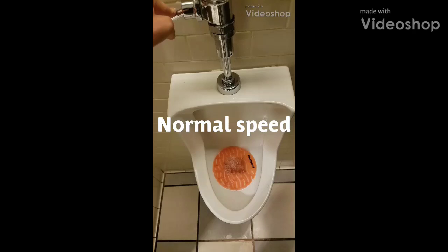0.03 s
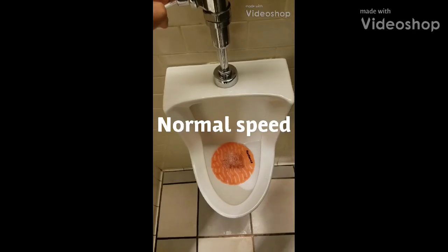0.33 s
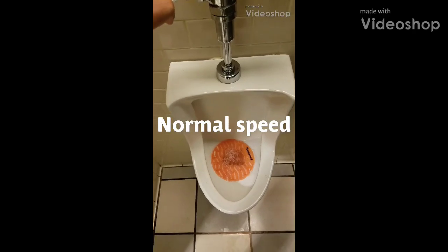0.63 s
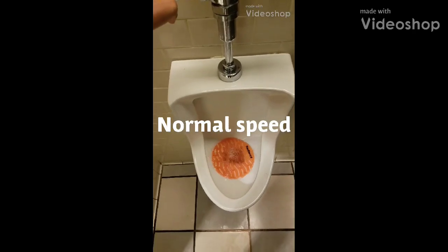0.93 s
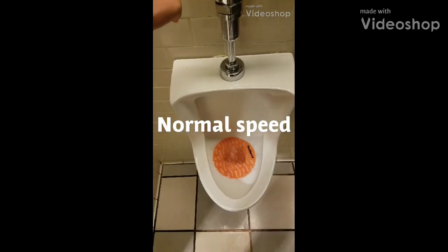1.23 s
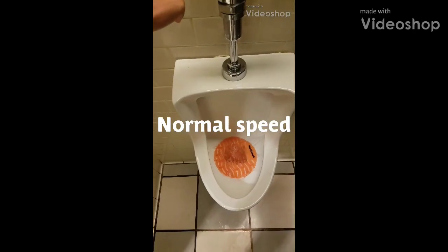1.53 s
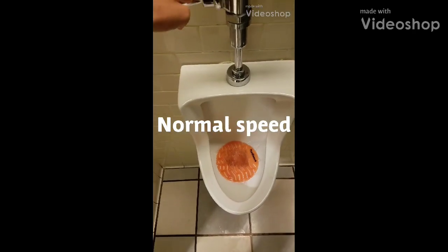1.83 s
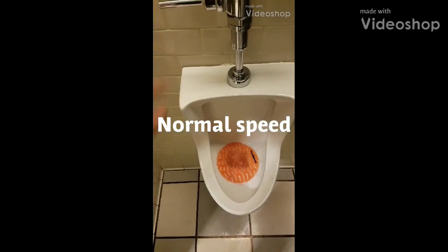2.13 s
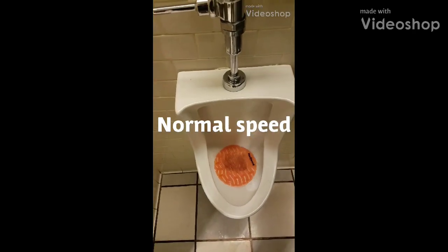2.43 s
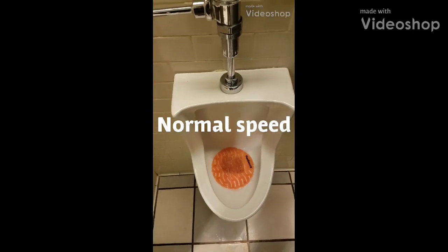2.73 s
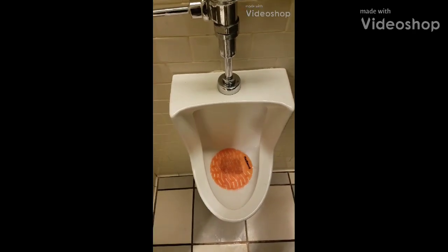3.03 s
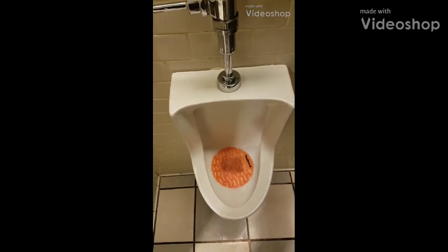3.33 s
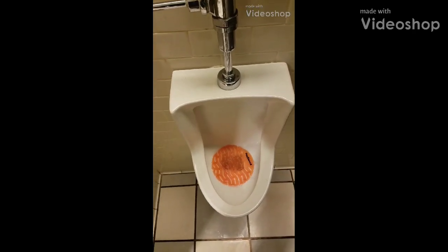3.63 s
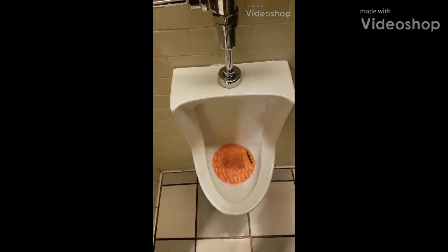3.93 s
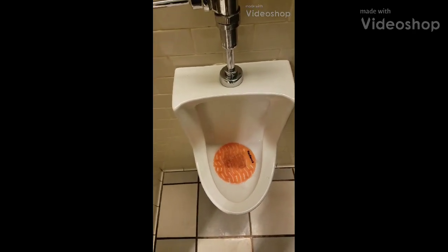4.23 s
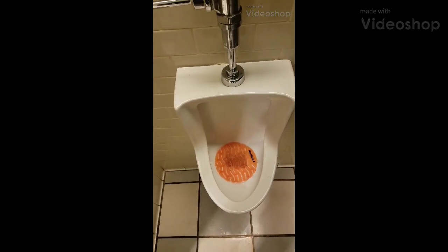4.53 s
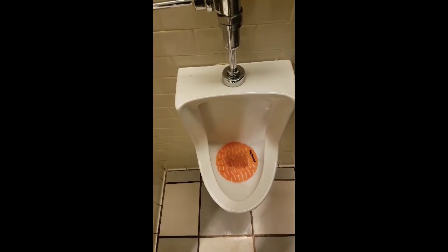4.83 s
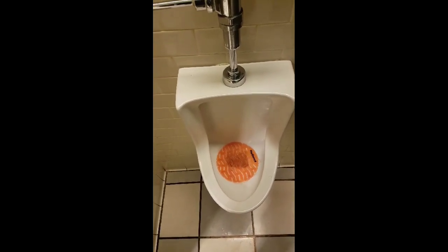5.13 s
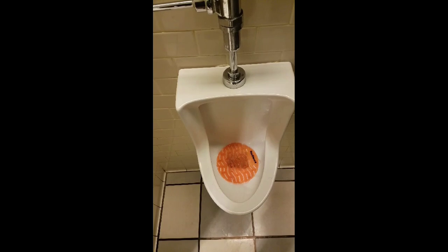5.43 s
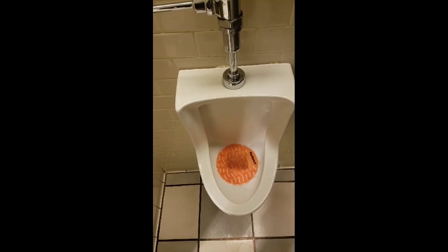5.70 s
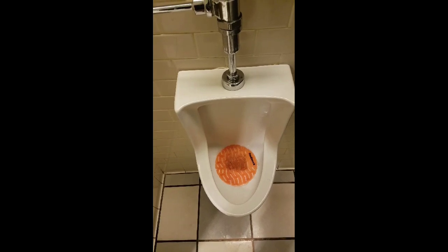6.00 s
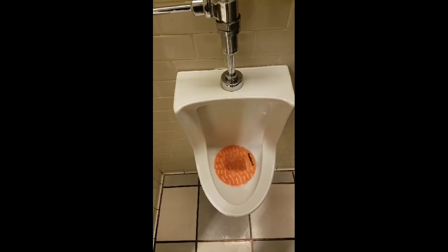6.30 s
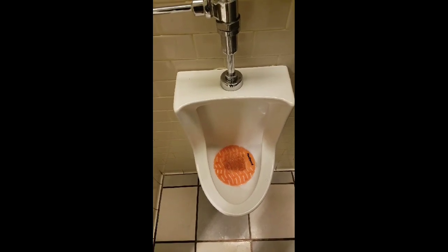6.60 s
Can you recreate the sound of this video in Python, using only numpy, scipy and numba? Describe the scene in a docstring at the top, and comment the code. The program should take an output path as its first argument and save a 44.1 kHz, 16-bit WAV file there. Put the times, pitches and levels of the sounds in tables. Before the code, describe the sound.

A urinal flushes with hissing, splashing water, then the pipe gives a loud horn-like groan and water drips in an echoing restroom.

```python
"""A thump and a rush of hissing water: a urinal is flushed in a tiled restroom, over a low rumble.
The jet sprays the porcelain, splashes in the pool and drags gulps of air into the trap (the drain's bend).
As the valve closes, its rubber diaphragm flutters and sounds the pipe like a horn: a loud groan that
hisses with collapsing vapour bubbles and rings on in the room. Then the last water trickles and drips."""
import sys
import numpy as np
from scipy import signal
from scipy.fft import rfft, irfft, next_fast_len
from scipy.io import wavfile
from numba import njit

SR = 44100
rng = np.random.default_rng(int(sys.argv[2]) if len(sys.argv) > 2 else 0)


def transcribe(u):
    """Save the signal u as a 16-bit wav file named by the first command-line argument.

    u: samples, shape (n,) or (channels, n), limited to [-1, 1]; the rate is SR.
    q: integer samples, one column per channel.
    """
    v = np.clip(np.atleast_2d(u).T, -1, 1)
    q = np.round(v * 32767).astype(np.int16)
    wavfile.write(sys.argv[1], SR, q)


N = 298116
T = np.arange(N) / SR
START_S, TRAP_CLEARS_S = 0.1332, 1.895  # the sound begins; the trap stops drawing air
SPUTTER_START_S, SPUTTER_END_S = 2.988, 3.098
GROAN_START_S = 4.072

# how hard water pours into the pool (time [s], level [dB])
POUR_LEVEL = [(0.14, -4.5), (0.26, -6.5), (0.41, -0.5), (1.12, 2), (1.62, -2), (2.05, -11), (2.36, -7.5),
              (2.55, -14), (3.45, -20), (4.04, -15)]
# tone of sizzling water (frequency [Hz], level [dB])
SIZZLE_TONE = [(3000, -39), (3700, -2), (4300, -3.5), (4800, 1), (5300, -3.5), (6100, -2.5), (7200, -24.5)]
# tone of spray hitting porcelain (frequency [Hz], level [dB])
SLAP_TONE = [(700, -21), (1800, -11), (2400, -6.5), (2670, 1), (3000, -5.5), (3500, -15.5), (4200, -10),
             (5000, -22), (15000, -37)]
# tone of the rumble of room and pipes (frequency [Hz], level [dB])
RUMBLE_TONE = [(20, -39), (45, -6.5), (65, -5.5), (85, 7.5), (105, -2.5), (160, -0.5), (220, -3.5),
               (340, -1), (500, -14), (900, -22.5), (2500, -19), (6000, -39), (15000, -53)]


def undb(db):
    """Turn decibels into a gain."""
    return 10 ** (np.asarray(db) / 20)


def unit(x):
    """Scale a signal to an average strength (rms) of 1."""
    return x / np.sqrt(np.mean(x ** 2) + 1e-20)


def curve(points):
    """Join (time, value) points with straight lines."""
    return np.interp(T, *np.transpose(points))


def at(points, hz):
    """Read between (frequency, value) points, with octaves evenly spaced."""
    f, value = np.transpose(points)
    return np.interp(np.log(hz + 1), np.log(f), value)


def colour(x, tone):
    """Filter a signal by (frequency, level) points; the result has strength 1."""
    size = next_fast_len(len(x))
    gain = undb(at(tone, np.fft.rfftfreq(size, 1 / SR)))
    return unit(irfft(rfft(x, size) * gain, size)[:len(x)])


def noise():
    """White noise."""
    return rng.standard_normal(N)


def wander(rate):
    """A random curve of strength 1 that turns about `rate` times a second."""
    return unit(np.interp(T * rate, np.arange(N // 20), rng.standard_normal(N // 20)))


def since(start):
    """Seconds since a moment; 0 before it."""
    return np.maximum(T - start, 0)


def between(start, end, fade):
    """1 from start to end, fading to 0 on either side."""
    return np.clip(1 + np.minimum(T - start, end - T) / fade, 0, 1)


def bursts(times, peaks_db, rise, decay):
    """A loudness curve that jumps up and dies away at each given time."""
    out, t = np.zeros(N + SR), T[:SR // 5]
    shape = (1 - np.exp(-t / rise)) * np.exp(-t / decay)
    for s, db in zip(times, peaks_db):
        out[int(s * SR):int(s * SR) + len(t)] += undb(db) * shape / shape.max()
    return out[:N]


@njit
def ring(start, hz, ring_s, size, glide):
    """Each bubble rings as a fading tone whose pitch rises as it nears the surface."""
    out = np.zeros(N)
    for k in range(len(start)):
        first, length, phase = int(start[k] * SR), int(ring_s[k] * SR) + 2, 0.
        for i in range(min(length, N - first)):
            phase += 2 * np.pi * hz[k] * (1 + glide * i / length) / SR
            envelope = np.exp(-6.9 * i / length) * (1 - np.exp(-phase / 5))
            out[first + i] += size[k] * envelope * np.sin(phase)
    return out


def bubbles(lo_hz, hi_hz, cycles, spread_db, count):
    """A cloud of bubbles of all sizes; more spread makes a few stand out."""
    when, pitch, chance = rng.random((count, 3)).T
    hz = lo_hz * (hi_hz / lo_hz) ** pitch
    size = undb(-spread_db * np.log(.02 + chance)) * hz / lo_hz
    return unit(ring(when * N / SR, hz, cycles / hz, size, glide=0.19))


def patter(spread_db, rate):
    """Droplets bursting: noise whose strength jumps from one instant to the next."""
    return noise() * undb(spread_db * wander(rate))


def pipe_thump():
    """The pipe knocks and thumps as the valve opens."""
    thump = colour(noise(), [(25, -16), (45, -14), (80, -6), (200, 1), (500, -3), (2000, -50)])
    knock = colour(noise(), [(60, 5), (600, 2), (4000, -12), (9000, -28)])
    return (thump * bursts([.146], [-38], rise=0.0052, decay=0.055)
            + knock * bursts([.156], [-29], rise=.0002, decay=0.0012))


def jet():
    """The jet hisses, flickering while air is drawn in, and sizzles more as the valve narrows."""
    # flow through the valve (time [s], level [dB])
    flow_level = [(0.14, -3), (0.3, -0.5), (0.83, 1.5), (1.22, 0.9), (1.45, 1), (2.4, -2), (3.2, -3.2),
                  (3.6, -5), (4.04, -10.5)]
    # tone of the jet (frequency [Hz], level [dB])
    jet_tone = [(120, -39), (230, -51), (310, -74), (410, 2), (520, 0), (740, -24.5), (1300, -16),
                (1800, -11.5), (2400, -12.5), (2800, -10), (3300, -15.5), (4500, -19.5), (7000, -16.5),
                (8800, -15), (9800, -15.5), (13500, -13), (15700, -14)]
    flow_db = curve(flow_level)
    flicker_db = 1.1 * wander(30) * between(0, TRAP_CLEARS_S, fade=.3)
    narrowing_db = 11.5 * np.minimum(since(1.17) / 0.57, 1)
    hiss = in_bowl(colour(patter(spread_db=1.5, rate=400), jet_tone))
    sizzle = in_bowl(colour(patter(spread_db=0.5, rate=100), SIZZLE_TONE))
    return hiss * undb(-42.5 + flow_db + flicker_db) + sizzle * undb(-59 + flow_db + narrowing_db)


def in_bowl(x):
    """Quick echoes off the porcelain make a sound hollow."""
    # echoes from the bowl's walls (delay [s], gain [ratio])
    echoes = [(.0009, 0.17), (.0021, -0.13), (.0034, .12)]
    return unit(x + sum(gain * np.interp(T - delay, T, x, left=0) for delay, gain in echoes))


def trap_churn():
    """Air churns in the trap, dies down as the trap clears and is stirred again by the sputter."""
    # tone of the churning (frequency [Hz], level [dB])
    churn_tone = [(40, -56), (90, -28.5), (190, -20.5), (260, -12), (320, -9), (352, 7.5), (378, -23.5),
                  (406, -2.5), (450, -21.5), (490, -12), (650, -34), (1200, -53)]
    clearing_db = -11 * np.minimum(since(TRAP_CLEARS_S) / 0.12, 1)
    stirring_db = 11 * between(SPUTTER_START_S, SPUTTER_END_S, fade=0.071)
    churn = colour(bubbles(54.3, 940, cycles=7.3, spread_db=2.0, count=5000), churn_tone)
    return churn * undb(-36.5 + 0.94 * curve(POUR_LEVEL) + clearing_db + stirring_db)


def splash_and_spray():
    """Water splashes unevenly in the pool and sprays the porcelain, making clouds of bubbles."""
    # tone of the pool (frequency [Hz], level [dB])
    splash_tone = [(350, -38), (560, -14), (635, 6), (665, 8), (700, 2.5), (800, 1), (1100, -3), (1480, -6),
                   (1560, -2), (1650, -4.5), (2100, -10), (3500, -19), (7000, -48)]
    # tone of the spray (frequency [Hz], level [dB])
    spray_tone = [(900, -16), (1800, -12.5), (2200, 1.5), (2450, -1), (2680, -1), (3000, -3.5), (3400, -12),
                  (4000, -8), (6000, -34), (15000, -43)]
    weakens_s, mist_db = 2.294, -57  # spray builds until the jet falls short; a fine mist stays
    spray_db = np.maximum(-42 - 6.5 * np.maximum(weakens_s - T, 0) - 53 * since(weakens_s), mist_db)
    splash_db = -41 + curve(POUR_LEVEL)
    splash = colour(bubbles(450, 6000, cycles=16, spread_db=2, count=11000), splash_tone)
    splash *= undb(splash_db + 0.7 * wander(16))
    spray = colour(bubbles(1252, 14400, cycles=22, spread_db=2.5, count=20000), spray_tone)
    spray *= undb(spray_db + 0.7 * wander(16))
    # a few millimetre-sized bubbles ring out of the spray
    pings = colour(bubbles(2020, 4850, cycles=70, spread_db=3, count=1600), SLAP_TONE)
    return splash + spray + pings * undb(np.maximum(spray_db, splash_db - 9.5) - 3)


def rumble():
    """The ventilation rumbles and wavers; the supply pipe joins in, shuddering as the valve opens."""
    vent = undb(-59.5)
    shudder = undb(-42) * np.exp(-since(START_S) / 0.28)
    pipe = undb(-62 + curve(POUR_LEVEL)) + shudder
    return colour(noise(), RUMBLE_TONE) * np.hypot(vent, pipe) * undb(wander(4))


def tiled_room():
    """Return a function giving the echo off the tiles, where each octave fades at its own rate."""
    # how long the room rings (frequency [Hz], time to fade by 60 dB [s])
    ring_times = [(100, 1.2), (400, 1.65), (800, 1.5), (1600, 1.2), (3200, 1.2), (6400, 1), (12800, .55)]
    t = T[:2 * SR]
    spectrum, f = rfft(rng.standard_normal(len(t))), np.fft.rfftfreq(len(t), 1 / SR)
    octaves_hz, tail = 100 * 2. ** np.arange(8), 0
    for hz, share in zip(octaves_hz, np.eye(len(octaves_hz))):
        band = irfft(spectrum * np.interp(np.log(f + 1), np.log(octaves_hz), share))
        fade_rate = np.log(1000) / at(ring_times, hz)
        tail += band * np.exp(-fade_rate * t) * np.sqrt(2 * fade_rate / SR)
    size = next_fast_len(N + len(t))
    response = rfft(tail * np.clip(t / 0.0009, 0, 1), size)
    return lambda x: irfft(rfft(x, size) * response, size)[:N]


def gulps():
    """Single pockets of air ring in the pipe, trap and drain."""
    # air pockets (time [s], level [dB], pitch [Hz])
    pockets = [(0.141, -31.5, 339), (0.328, -25.5, 343), (0.409, -25, 342), (0.533, -37, 356),
               (0.667, -22, 357), (0.859, -24.5, 339), (1.08, -23, 351.3), (1.31, -24, 351),
               (1.414, -27, 341), (1.592, -24, 350), (1.759, -33, 351), (1.87, -35, 353.7),
               (2.333, -30, 402), (2.744, -47, 134), (3.059, -37.5, 345), (3.535, -41, 1585),
               (3.53, -42, 346), (3.6, -42, 351.4), (3.859, -40, 1145), (3.905, -40.5, 827),
               (3.976, -39.5, 514), (5.243, -38, 329), (5.33, -38, 289), (6.071, -39, 305)]
    times, db, hz = np.array(pockets, float).T.copy()
    return ring(times, hz, ring_s=67 / hz, size=undb(db), glide=0.03)


def spray_slaps():
    """Spray slaps the bowl, each hit with a bright edge of hiss."""
    # slaps (time [s], level [dB])
    hits = [(0.842, -32.5), (0.906, -37.5), (0.9366, -36), (1.0812, -35), (1.208, -33.5), (1.232, -35),
            (1.3356, -31.5), (1.4735, -37), (1.549, -37.5), (1.6633, -33.5), (1.919, -35.5), (1.987, -34.5),
            (2.064, -33), (2.237, -33.5)]
    slap = colour(noise(), SLAP_TONE) + undb(-21) * colour(noise(), SIZZLE_TONE)
    return slap * bursts(*np.transpose(hits), rise=0.0017, decay=0.0081)


def valve_whistle():
    """The narrowing gap of the valve sings faintly."""
    whistle = colour(noise(), [(4600, -41), (5050, -15), (5230, 17), (5600, -8), (6300, -30)])
    return whistle * undb(-51) * between(2.16, 2.34, fade=0.41)


def valve_sputter():
    """A pocket of air passes through the valve: a sputter that starts hard and sags."""
    # tone of the sputter (frequency [Hz], level [dB])
    sputter_tone = [(600, -19), (1500, -8), (1790, -5), (1950, -8), (2130, 4), (2350, -12), (2660, 4.5),
                    (2950, -16), (3260, -3), (3600, -15), (4700, -7.5), (8000, -38)]
    spit = colour(patter(spread_db=1.5, rate=150), sputter_tone) * undb(-38.5)
    hiss = colour(noise(), SIZZLE_TONE) * undb(-52)
    sag = undb(-26 * since(SPUTTER_START_S))
    return (spit + hiss) * sag * between(SPUTTER_START_S, SPUTTER_END_S, fade=0.017)


def groan(room):
    """The valve's diaphragm beats against its seat and sounds the pipe like a horn."""
    # pitch of the flutter (time [s], pitch [Hz])
    pitch = [(4.055, 383), (4.08, 402), (4.105, 409), (4.135, 391), (4.18, 390), (4.25, 392.5), (4.46, 395),
             (4.66, 395.3), (4.78, 393.7)]
    # the horn's tones (multiple of the pitch [ratio], relative level [dB], echo against direct [dB])
    harmonics = [(1, -3, -3), (2, 0.24, -14.5), (3, -7, -17), (4, -10, -9), (5, -16.5, 2), (6, -14.5, 28),
                 (7, -14, 33), (8, -19, -2), (9, -14.5, -3), (10, -17.5, 27), (11, -19, 20), (12, -19.5, 2),
                 (13, -26, 5), (14, -23.5, -6), (15, -41, 10), (16, -24.5, -6)]
    end_s, pipe_ring_s = 4.762, 0.035  # the pipe rings on, higher tones more briefly
    age = since(GROAN_START_S)
    swell_db = -11 * np.exp(-age / 0.067)
    # timing and loudness lurch until the flutter locks to the pipe
    uneven = 0.0072 + .2 * np.exp(-age / .13)
    # no two beats are equally long, which blurs the high tones
    hz = curve(pitch) * (1 + .0075 * wander(400))
    phase = 2 * np.pi * np.cumsum(hz) / SR + uneven * wander(250)
    attack = between(GROAN_START_S, 7, fade=0.018)
    horn = 0
    for k, db, echo_db in harmonics:
        sounding = attack * np.exp(-k * since(end_s) / pipe_ring_s)
        # the three tones that the pipe favours grow; the others waver and fade
        drift_db = 7 * age if k in (1, 2, 7) else 2.6 * wander(16) - 5.5 * age
        size = undb(swell_db + drift_db + 22 * uneven * wander(40)) * sounding
        tone = np.sin(k * phase + rng.uniform(0, 2 * np.pi)) * size
        heard = unit(tone) + undb(echo_db) * unit(room(tone))
        horn += undb(db - 26) * heard / np.std(heard[sounding > .5])
    hiss = vapour_hiss(phase)
    return horn + undb(-5.5) * hiss + undb(-4) * room(hiss)


def vapour_hiss(phase):
    """Vapour bubbles form and collapse behind the valve seat each time it opens (cavitation)."""
    # tone of the collapsing bubbles (frequency [Hz], level [dB])
    hiss_tone = [(100, -19), (280, -10.5), (450, 10.5), (620, -9), (1000, -10.5), (1400, -3.5), (2000, 1.5),
                 (2600, 3), (3200, -3), (4700, 2), (6800, -3.5), (8200, -7), (10000, -11.5), (13000, -7),
                 (15700, -9.5)]
    end_s, fade_s = 4.748, 0.024  # the flow stops just before the flutter does
    building = 1 - np.exp(-since(GROAN_START_S - fade_s) / 0.028)
    level = undb(-28 - 8 * since(GROAN_START_S)) * building * between(0, end_s, fade_s)
    return colour(noise() * (1 + np.cos(phase)), hiss_tone) * level


def droplets():
    """Tiny droplets fizz and tick on the bare porcelain."""
    # ticks (time [s], level [dB])
    hits = [(5.095, -48.5), (5.122, -51), (5.198, -59), (5.243, -55), (5.69, -61), (5.825, -52.5),
            (6.41, -55.5)]
    fizz = colour(patter(spread_db=5, rate=90), [(3000, -6), (7000, -2), (10000, -4), (14000, 0)])
    ticks = colour(noise(), [(2500, -7), (6500, 1.5), (10000, -21), (13500, -5)])
    return (fizz * undb(-78) * between(4.7, 7, fade=0.16)
            + ticks * bursts(*np.transpose(hits), rise=0.00078, decay=0.0056))


def trickle():
    """A film of water slides off the porcelain, then the rim drains; both burble into the pool."""
    # tone of the trickle (frequency [Hz], level [dB])
    trickle_tone = [(450, -15), (640, 0), (810, 0.5), (1100, -8.5), (1400, -16), (1750, -4), (2000, -17),
                    (2300, -0.5), (3000, -26), (4200, -21), (6000, -32), (8000, -42), (11000, -34),
                    (15700, -37)]
    film_s, rim_s = 5.15, 5.68
    film = undb(-51.5 - 26.5 * since(film_s)) * between(film_s, 7, fade=0.45)
    rim = undb(-57.5 + 5 * since(rim_s) + 1.5 * wander(9)) * between(rim_s, 7, fade=0.036)
    stream = colour(bubbles(504, 15320, cycles=50, spread_db=3.6, count=7000), trickle_tone)
    burble = colour(bubbles(550, 984, cycles=33, spread_db=2.5, count=700), trickle_tone)
    return (stream + undb(-9.5) * burble) * np.hypot(film, rim)


def gurgles():
    """The trap gurgles as it swallows, and each gurgle booms in the waste pipe."""
    # swallows (time [s], length [s], level [dB])
    swallows = [(5.11, 0.048, -49), (5.246, 0.15, -48.5), (5.794, 0.15, -58.5), (6.072, .04, -51),
                (6.364, 0.028, -54)]
    level = sum(undb(db) * between(s, s + length, fade=0.067) for s, length, db in swallows)
    air = bubbles(197, 417, cycles=8.4, spread_db=2.5, count=900)
    gurgle = colour(air, [(150, -14), (260, -7), (335, 8.5), (450, -10)])
    boom = undb(-4.5) * colour(noise(), RUMBLE_TONE)
    return (gurgle + boom) * level


def drips():
    """Each drop traps one ringing bubble in the pool and scatters many tiny ones."""
    # drops (time [s], bubble level [dB], bubble pitch [Hz], splash level [dB])
    drops = [(5.526, -35.5, 851, -76), (5.574, -29.5, 806, -51), (5.675, -43, 898, -47),
             (5.688, -58, 794, -42.5), (5.73, -54, 800, -43), (5.801, -58, 794, -37.5),
             (5.827, -42, 810, -42), (6.012, -47, 807, -43), (6.03, -44, 770, -45),
             (6.089, -34.5, 808, -46), (6.163, -39.5, 788, -62), (6.27, -34.5, 844, -39.5),
             (6.309, -40, 815, -37), (6.43, -34, 810, -55), (6.479, -35.5, 804, -52),
             (6.538, -37, 750, -44), (6.6, -41, 790, -38), (6.632, -40, 685, -55), (6.692, -46, 736, -50),
             (6.731, -33, 810, -47)]
    # tone of a drop's splash (frequency [Hz], level [dB])
    splash_tone = [(400, -8), (900, 8.5), (1700, 3), (2300, 12), (3000, -1.5), (4200, -7), (6000, -13),
                   (9000, -29), (14000, -28)]
    times, db, hz, splash_db = np.array(drops, float).T.copy()
    plops = ring(times, hz, ring_s=np.full(len(times), 0.068), size=undb(db), glide=0.068)
    splash = colour(bubbles(787, 16200, cycles=21, spread_db=0, count=40000), splash_tone)
    return plops + splash * bursts(times, splash_db - 6.5, rise=0.00061, decay=0.014)


def strainer_tinkle():
    """As the pool sinks, drops strike the bare strainer and tinkle."""
    pings = bubbles(2450, 9400, cycles=93, spread_db=3, count=4000)
    tinkle = colour(pings, [(2500, 5), (4000, 5), (5000, -6), (7000, -12), (9000, -34)])
    return tinkle * undb(-58) * between(6.74, 7, fade=0.61)


def scene():
    """Water close by, the groaning pipe and the room around them."""
    room = tiled_room()
    valve_open = between(0, 4.06, fade=0.2)
    water = (jet() + trap_churn() + splash_and_spray() + valve_whistle()) * valve_open
    water += pipe_thump() + gulps() + spray_slaps() + valve_sputter()
    water += droplets() + trickle() + gurgles() + drips() + strainer_tinkle()
    return (undb(-1.2) * water + undb(-7) * room(water) + groan(room) + rumble())[None]


def record(dry):
    """Keep silence until the flush begins, and cut the highest treble."""
    top_hz = 15800
    treble_cut = signal.ellip(10, .2, 80, top_hz, fs=SR, output="sos")
    return signal.sosfilt(treble_cut, dry * between(START_S, 7, fade=0.001))


dry = scene()
out = record(dry)
transcribe(out)
```